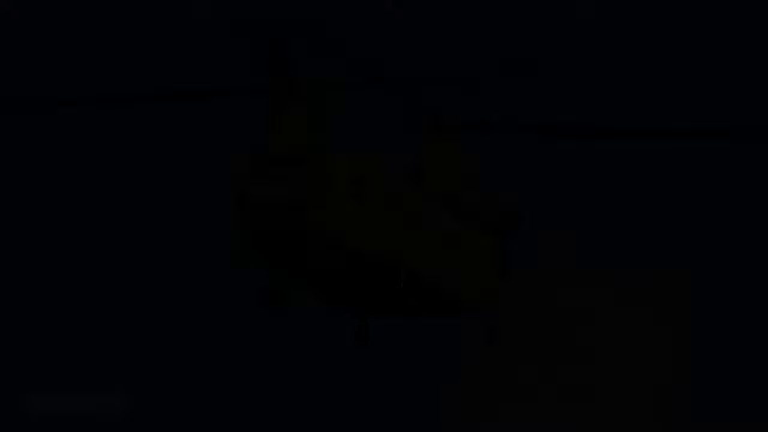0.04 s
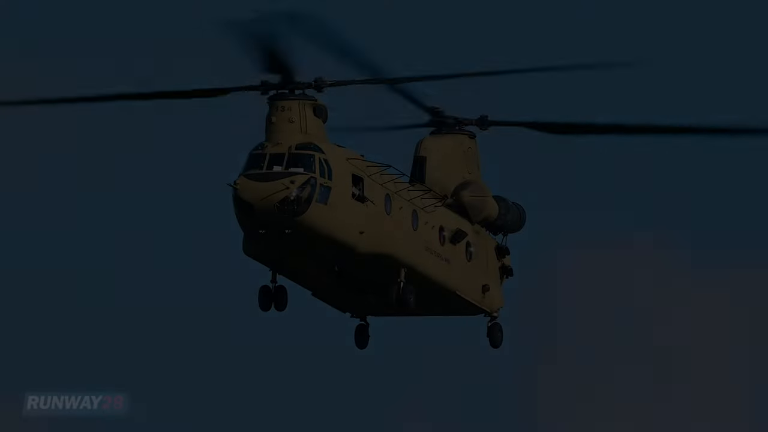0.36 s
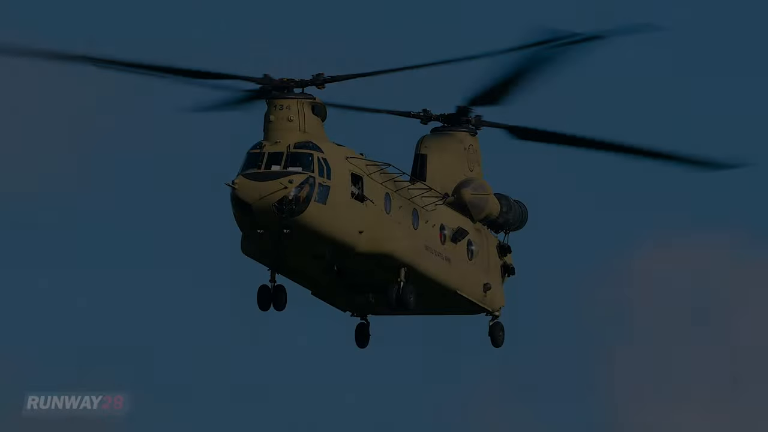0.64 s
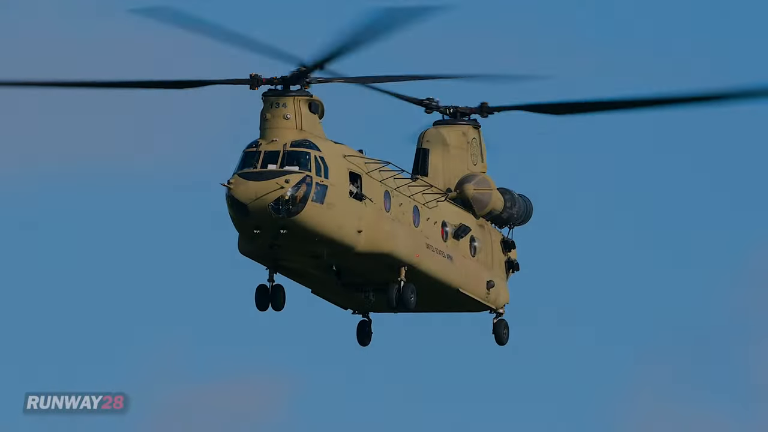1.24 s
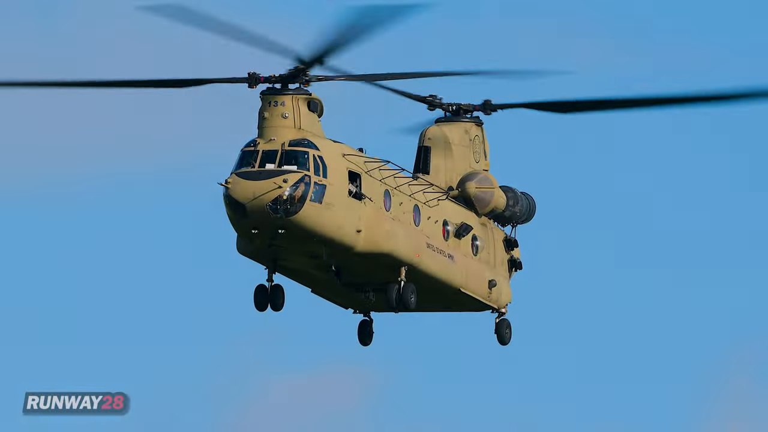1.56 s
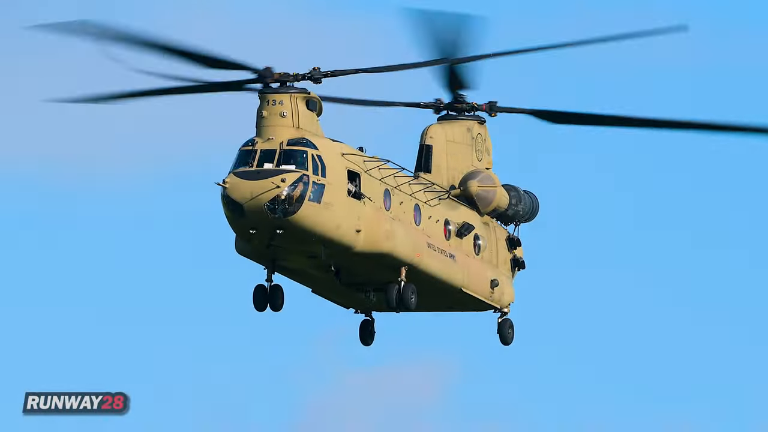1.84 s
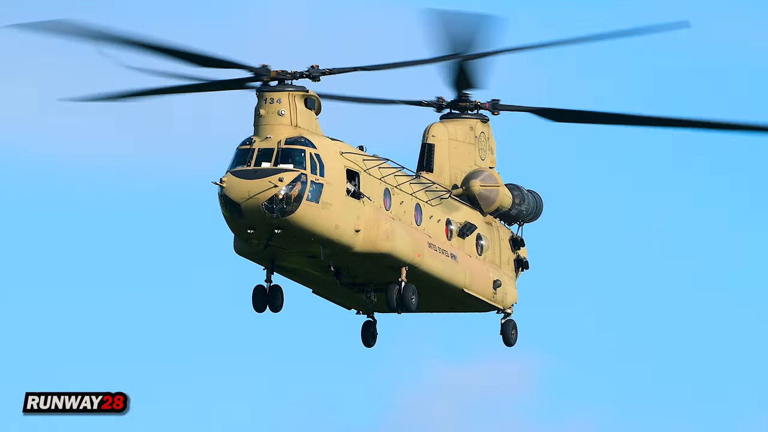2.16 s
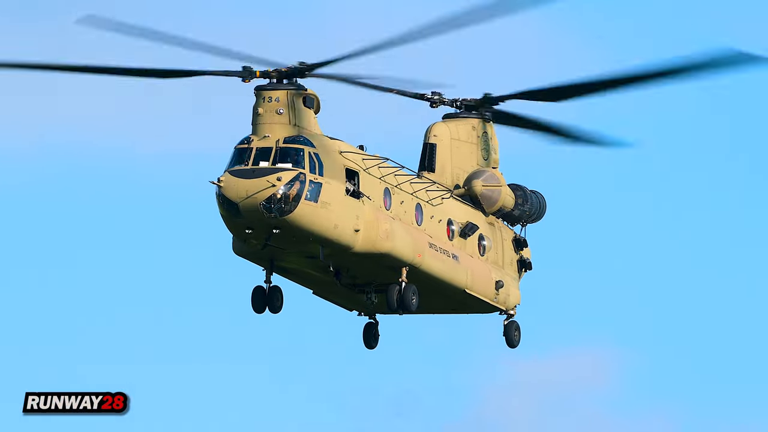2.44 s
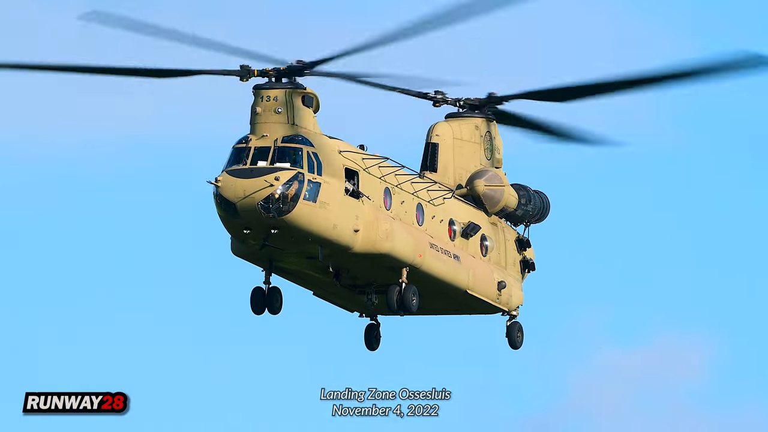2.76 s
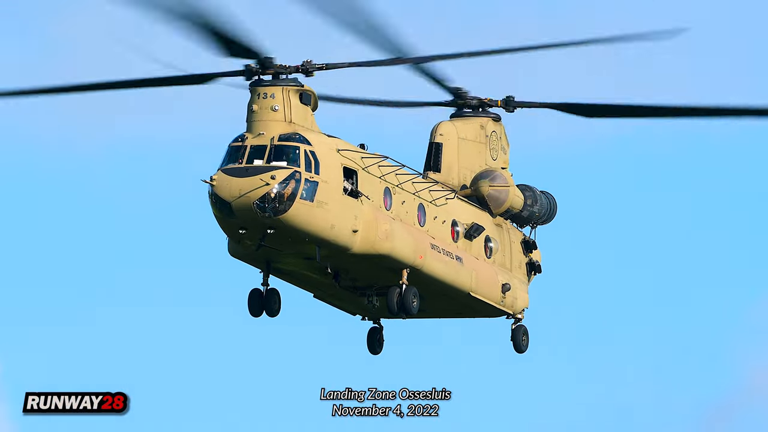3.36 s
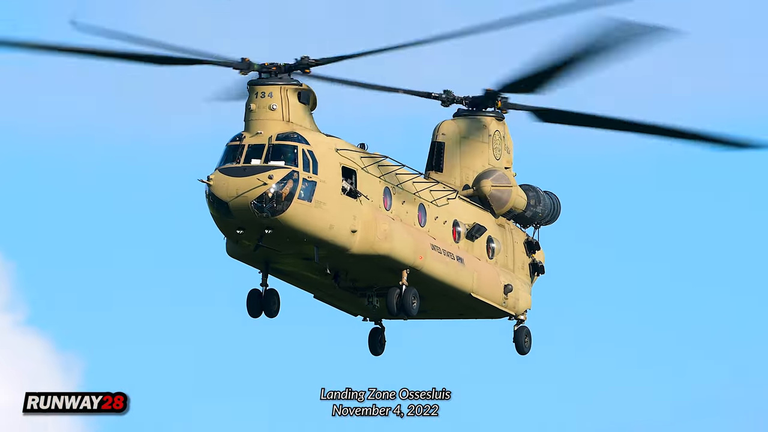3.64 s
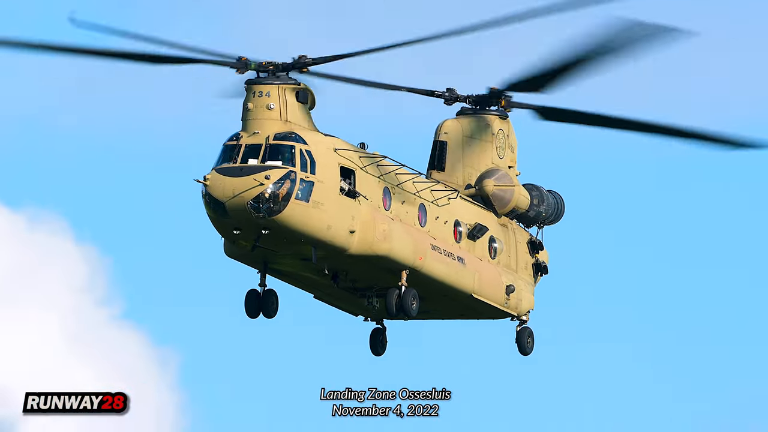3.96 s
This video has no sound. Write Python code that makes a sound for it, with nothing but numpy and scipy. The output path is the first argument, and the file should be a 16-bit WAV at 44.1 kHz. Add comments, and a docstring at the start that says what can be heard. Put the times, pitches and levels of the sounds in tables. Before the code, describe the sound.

A twin-rotor helicopter fades in from silence in open air, reaching full loudness by about 1.5 to 2 seconds. Its blades beat in a fast, even chop of low thumps and ragged slaps over rushing air and turbine hiss. A high gear whine stands out from about 1.7 to 2.5 seconds. The slaps soften around 2 seconds, then harden a little after 3.3 seconds as the helicopter stays loud.

```python
"""Open air, a tandem-rotor helicopter coming past a nearly mono microphone.
The sound fades in from silence: rotor wash, turbine hiss and a gearbox whine. Over them each blade pass
gives low thumps and two ragged slaps where blades cut the vortices of the other rotor; their spacing
drifts as the aircraft moves. By about two seconds the fade is fully up and the hard slaps have gone soft;
near the end they harden a little again. A limiter holds the peaks."""
import sys
import numpy as np
from scipy import signal
from scipy.fft import rfft, irfft, next_fast_len
from scipy.io import wavfile
from scipy.ndimage import uniform_filter1d, minimum_filter1d, map_coordinates

SR = 44100
rng = np.random.default_rng(int(sys.argv[2]) if len(sys.argv) > 2 else 0)


def bounce(signal):
    """Save signal as a 16-bit WAV file at the path given by the first command-line argument."""
    frames = np.transpose(np.atleast_2d(signal))
    limited = np.clip(frames, -1, 1)
    pcm = np.round(limited * 32767).astype(np.int16)
    wavfile.write(sys.argv[1], SR, pcm)


N = 176400

# Steady noise before the fader (time [s], rotor wash [dB], turbine hiss [dB], flutter depth [dB])
AIR_LEVELS = [(.2, -18, -27.5, 0), (.8, -25, -30, -1), (1.3, -25, -27.5, -1.6), (1.75, -24.5, -26.5, 0.5),
              (2.3, -18, -24.5, 1.1), (2.6, -18, -26, 2), (3.05, -19.5, -28.5, 1), (3.5, -19, -24.5, 2),
              (4, -13.5, -21.5, 2.5)]
# How hard the blades slap (time [s], hardness [0-1])
HARDNESS = [(0.199, 0.94), (1.8, 0.51), (2.149, 0), (3.3, 0.01), (4, 0.55)]


def amp(db):
    """Decibels to gain."""
    return 10 ** (np.asarray(db) / 20)


def unit(x):
    """Scale to rms 1."""
    return x / np.sqrt(np.mean(x ** 2) + 1e-20)


def curves(rows, at=None):
    """Each column after the time, at the given times or at every sample."""
    times, *columns = np.transpose(rows)
    return [np.interp(np.arange(N) / SR if at is None else at, times, c) for c in columns]


def wobble(rate):
    """A smooth random curve, rate knots a second."""
    knots = rng.standard_normal(int(N * rate / SR) + 4)
    return map_coordinates(knots, [np.arange(N) * rate / SR])


def gain_at(hz, colour):
    """Gain of a (frequency [Hz], level [dB]) shape at the given frequencies."""
    f, db = np.transpose(colour)
    return amp(np.interp(np.log(hz + 1), np.log(f), db))


def coloured(x, colour, size=4096):
    """x through a minimum-phase filter of energy 1 with the given shape."""
    cepstrum = irfft(np.log(gain_at(np.fft.rfftfreq(size, 1 / SR), colour)))
    cepstrum[1:size // 2] *= 2
    cepstrum[size // 2 + 1:] = 0
    impulse = irfft(np.exp(rfft(cepstrum)))
    return signal.fftconvolve(x, impulse / np.linalg.norm(impulse))[:N]


def add(track, s, sound):
    """Mix a sound into a track, centred on time s."""
    i = round(s * SR) - len(sound) // 2
    track[i:i + len(sound)] += sound


def alike(draw, count, likeness=0.76):
    """Random patterns, each partly kept from the blade pass before."""
    rows = [draw()]
    for _ in range(count - 1):
        rows.append(likeness * rows[-1] + np.sqrt(1 - likeness ** 2) * draw())
    return rows


def rotor_wash():
    """Air driven by the rotors: a low, unsteady rush."""
    colour = [(30, -39), (70, -50.5), (110, -20), (165, -1), (230, 2), (300, -5.5), (480, -7.5),
              (750, -11.5), (1300, -16.5), (2200, -33.5), (4000, -53.5), (7500, -80)]  # wash spectrum (frequency [Hz], level [dB])
    level_db = curves(AIR_LEVELS)[0] + 0.96 * wobble(40)
    return amp(level_db) * unit(coloured(rng.standard_normal(N), colour))


def flutter(pass_s=0.0849, peak_s=0.18):
    """The engines' treble rises and falls once per blade pass, in dB."""
    return curves(AIR_LEVELS)[2] * np.cos(2 * np.pi * (np.arange(N) / SR - peak_s) / pass_s)


def turbines():
    """Engine hiss and its thin top, both fluttering at the blade rate."""
    hiss_colour = [(300, -12), (900, 2.5), (1500, 2.5), (1780, 2.5), (2030, 3), (2450, -0.5), (2750, -1),
                   (3300, -1), (3750, -2), (4150, -10), (4700, -24), (6000, -33), (7500, -43.5)]  # hiss spectrum (frequency [Hz], level [dB])
    top_colour = [(3000, -29), (4200, 7), (4800, 2.5), (5800, -3), (7000, -14.5), (7400, -9.5), (7700, -37)]  # spectrum of the thin top (frequency [Hz], level [dB])
    top_level = [(.2, -52), (1, -58), (2, -55.5), (2.6, -49), (3.3, -50.5), (3.6, -45), (4, -46)]  # the top before the fader (time [s], level [dB])
    hiss_db = curves(AIR_LEVELS)[1] + flutter() + 1.46 * wobble(24.915)
    top_db = curves(top_level)[0] + flutter()
    hiss = unit(coloured(rng.standard_normal(N), hiss_colour))
    top = unit(coloured(rng.standard_normal(N), top_colour))
    return amp(hiss_db) * hiss + amp(top_db) * top


def gearbox(whine_hz=1868, waver_hz=6, sideband_hz=136, blur_hz=30):
    """A rough gear tone, a sideband and the blurred octave, flickering in the moving air."""
    levels = [(.2, -48.5, -41.5), (1.3, -38.5, -55), (1.6, -37.5, -48.5), (1.67, -29, -46),
              (1.9, -32, -41.5), (2.15, -30, -37.5), (2.44, -29.5, -38.5), (2.55, -39, -44),
              (2.8, -40, -39), (3.1, -48, -41.5), (4, -44, -40.5)]  # whine before the fader (time [s], fundamental [dB], octave [dB])

    def tone(hz, db):
        flicker_db = 1.5 * wobble(25) + 2.8 * wobble(160)
        return np.sqrt(2) * amp(db + flicker_db) * np.sin(2 * np.pi * np.cumsum(hz) / SR)

    gear_db, octave_db = curves(levels)
    gear_hz = whine_hz + waver_hz * wobble(30)
    fundamental = tone(gear_hz, gear_db)
    sideband = tone(gear_hz + sideband_hz + blur_hz * wobble(160), gear_db - 10)
    octave = tone(2 * gear_hz + blur_hz * wobble(200), octave_db + 3 * flutter())
    return fundamental + sideband + octave


def thumps(times, levels):
    """The pressure pulse of each blade: a dry, low knock."""
    colour = [(50, -19.5), (120, -5.5), (200, 4.5), (290, 1), (450, -10), (700, -18.5), (1200, -36.5),
              (4000, -68.5)]  # thump spectrum (frequency [Hz], level [dB])
    pulses = np.bincount(np.round(times * SR).astype(int), -amp(levels) * np.sqrt(0.0074 * SR), N)
    return coloured(pulses[:N], colour)


def slaps(times, levels, hard, soft, rise_s, hold_s, decay_s, soft_stretch, crack, pops_per_s):
    """A blade cuts a vortex: three quick clicks within a burst of pops; soft slaps click less."""
    track, t = np.zeros(N + SR), np.arange(-SR // 20, SR // 20) / SR
    clicks, click_gap_s = np.arange(3), 0.001968

    def crackle():
        return rng.choice([-1, 1], len(t)) * (0.022 + (rng.random(len(t)) < pops_per_s / SR))

    patterns = alike(crackle, len(times))
    for s, db, hardness, pops in zip(times, levels, curves(HARDNESS, times)[0], patterns):
        age = t / (1 + soft_stretch * (1 - hardness))
        envelope = np.exp(-np.where(age < 0, (age / rise_s) ** 2, np.maximum(age - hold_s, 0) / decay_s))
        slap = pops * envelope
        slap /= np.linalg.norm(slap)
        click_s = click_gap_s * (clicks - 1 + 0.26 * rng.standard_normal(3))
        click_at = len(t) // 2 + np.round(click_s * SR).astype(int)
        slap[click_at] -= crack * (.5 + .5 * hardness) * 0.82 ** clicks
        gain = amp(db) * np.sqrt(0.0092 * SR) / np.linalg.norm(slap)
        add(track, s + .0002 * rng.standard_normal(), gain * slap)
    hard_share = curves(HARDNESS)[0]
    return coloured(track[:N] * hard_share, hard) + coloured(track[:N] * (1 - hard_share), soft)


def air_bursts(times, level, colour, width_s):
    """Noise that swells around each given time, more abruptly when the slaps are hard."""
    track, t = np.zeros(N + SR), np.arange(-SR // 20, SR // 20) / SR
    for s, noise in zip(times, alike(lambda: rng.standard_normal(len(t)), len(times))):
        rise_s = width_s * (1 - 0.7 * curves(HARDNESS, s)[0])
        gate = np.exp(-(t / np.where(t < 0, rise_s, width_s)) ** 2)
        burst = unit(gate * coloured(noise, colour)[:len(t)])
        add(track, s, burst * np.sqrt(np.mean(gate ** 2)))
    return track[:N] * amp(curves(level)[0])


def swish(first_s, second_s):
    """A rasp of air at each blade pass, moving from the first slap to midway between the two."""
    colour = [(700, -11.5), (1500, 3), (2100, 6), (2400, -2), (2800, 5), (3300, -2.5), (3900, -4.5),
              (4600, -25.5), (7500, -62.5)]  # rasp spectrum (frequency [Hz], level [dB])
    level = [(.2, -13.5), (1, -27.5), (1.799, -27), (2.399, -32), (2.9, -22.5), (3.25, -21.5), (3.399, -24),
             (4, -24.5)]  # rasp before the fader (time [s], level [dB])
    place = [(.8, .05), (1.2, .5)]  # where it falls (time [s], way from first slap to second [0-1])
    times = first_s + curves(place, first_s)[0] * (second_s - first_s)
    return air_bursts(times, level, colour, width_s=0.014)


def whomp(first_s, second_s):
    """A low push of air just after the midpoint of each pair of slaps."""
    colour = [(60, -38), (120, -14.5), (190, 6.5), (270, 2), (350, -1), (470, -3), (650, -19.5),
              (1200, -32), (4000, -67)]  # whomp spectrum (frequency [Hz], level [dB])
    level = [(.2, -15), (1, -19.5), (1.7, -19), (2.3, -16), (2.9, -12.5), (3.402, -18.5), (4, -15)]  # whomp before the fader (time [s], level [dB])
    return air_bursts((first_s + second_s) / 2 + 0.00353, level, colour, width_s=0.02)


def rotors():
    """Each blade pass: a thump from each rotor, and two slaps within a swish and a whomp."""
    # Blade passes before the fader (time [s], thump [dB], other rotor's thump delay [ms], level [dB],
    # first slap delay [ms], level [dB], second slap delay [ms], level [dB])
    passes = [(0.1718, -13.4, 34, -10.3, 27.6, -6.3, 43, -9), (0.2568, -14.2, 33, -14.1, 26, -8, 42, -14),
              (0.3395, -14.8, 34, -16, 26.5, -7.5, 42, -11.8),
              (0.4219, -14.6, 37, -18, 27.7, -8.5, 44, -12),
              (0.5066, -13, 28, -10.8, 27, -7.5, 48.0, -13.5), (0.5906, -14.5, 34, -8.5, 25, -7, 50, -12.5),
              (0.6731, -15.5, 32, -16.8, 30.3, -9, 48, -12), (0.7574, -16, 30, -21, 29.2, -12.5, 43.7, -11),
              (0.843, -15.5, 29, -15, 28.5, -11.5, 44.5, -8.5),
              (0.9283, -32.7, 30, -13.5, 27.8, -8.5, 48.4, -10),
              (1.013, -17, 29, -13, 24.7, -12.5, 44.4, -6.5),
              (1.0982, -18.3, 29, -11.5, 24, -10, 43.5, -8.5),
              (1.1806, -21.2, 34, -13.4, 28.2, -9.5, 47, -9.5), (1.266, -20, 36, -11.5, 27.4, -7.6, 53, -9),
              (1.3515, -17, 32, -23, 28.4, -7, 49.7, -9), (1.4326, -22, 39, -13, 30.4, -11, 56.4, -9.5),
              (1.5208, -11.5, 34, -7, 29, -9.3, 52, -10.5), (1.6051, -12.9, 33, -3, 28.3, 1, 58, -13.5),
              (1.6903, -20, 34, -17, 30.5, -9, 51, -6), (1.776, -13, 38, -19, 26.3, -0.5, 54, -9.5),
              (1.8612, -13, 32, -17, 24.2, -9, 44, -7), (1.9453, -15.4, 31, -28.6, 24.3, -12, 46, -13.4),
              (2.0318, -12, 30, -12, 32.7, -14, 49.3, -14), (2.1177, -13.5, 30, -8, 24.4, -11.5, 46, -17.5),
              (2.2024, -16.5, 31, -6.5, 21.2, -20, 56, -25), (2.2899, -13.5, 32, -12.5, 24, -12.3, 41, -17),
              (2.3751, -12.5, 28, -10.5, 25.2, -14, 42.3, -10),
              (2.4588, -15, 32, -13, 20.4, -12.5, 47.3, -13), (2.5469, -7, 26, -31, 20.7, -14, 39, -17),
              (2.6307, -17, 27, -6, 20.3, -21, 39, -16.5), (2.717, -11.5, 25, -12, 23.4, -12, 39.3, -13),
              (2.8036, -10, 29, -13, 23.1, -6, 35, -16), (2.888, -12.5, 24, -17.5, 24.7, -13.3, 37, -9.5),
              (2.9726, -8.5, 28, -7, 22.3, -16, 31, -9), (3.0602, -9, 24, -10.5, 29, -11.5, 33, -9),
              (3.1443, -8.5, 26, -13, 20.4, -11, 35.6, -8), (3.2289, -8, 26, -9, 19.3, -12.5, 35.2, -10.5),
              (3.3159, -7, 24, -7.5, 23.5, -13, 32.5, -15), (3.4012, -7, 29, -24, 20.5, -8.5, 30.3, -8),
              (3.4852, -4, 26, -17, 26, -15, 30.5, -19), (3.572, -6, 24, -8, 27.3, -6, 22.4, -8.5),
              (3.658, -7, 29, -15, 22.7, -16, 29.4, -9), (3.7412, -8, 27, -11, 24.4, -12, 32.3, -16),
              (3.8272, -7.9, 31, -14, 26.6, -6, 29, -20), (3.912, -3.5, 30, -10.5, 25.4, -10.5, 29.7, -21)]
    # Spectra of the two slaps, hard and soft (frequency [Hz], level [dB])
    first_hard = [(60, -34.5), (120, -34), (230, -7.5), (340, -3), (460, 4), (630, -8.5), (850, -2),
                  (1080, 1.5), (1400, -14.5), (2100, -10.5), (2600, -25.5), (3700, -24.5), (4600, -46.5),
                  (7500, -86)]
    first_soft = [(60, -28), (120, -16.5), (200, 6), (280, 3), (400, -4), (800, 0), (1200, -14),
                  (2200, -23.5), (3600, -24.5), (4600, -36.5), (7500, -63.5)]
    second_hard = [(60, -51), (130, -20), (290, 11), (420, 5), (550, 5), (800, -11), (1400, -3),
                   (2500, -32.5), (3700, -16), (4600, -44), (7500, -74)]
    second_soft = [(60, -51), (120, -1), (210, -6), (340, -6), (490, 5), (700, -2), (1100, -6.5),
                   (2200, -18.5), (3600, -30), (4600, -44.5), (7500, -65)]
    times, thump_db, other_ms, other_db, first_ms, first_db, second_ms, second_db = np.transpose(passes)
    other_s, first_s, second_s = times + np.array([other_ms, first_ms, second_ms]) / 1000
    knocks = thumps(times, thump_db) + thumps(other_s, other_db)
    first = slaps(first_s, first_db, first_hard, first_soft,
                  rise_s=.002, hold_s=.002, decay_s=.0045, soft_stretch=.9, crack=.7, pops_per_s=900)
    second = slaps(second_s, second_db, second_hard, second_soft,
                   rise_s=.006, hold_s=.004, decay_s=.009, soft_stretch=0, crack=.35, pops_per_s=700)
    return knocks + first + second + swish(first_s, second_s) + whomp(first_s, second_s)


def scene(side_delay_s=0.0037):
    """The whole sound fades in from silence; almost mono, a little wider in the treble."""
    fader = [(0, -102), (.12, -56), (.2, -47), (.3, -35), (.45, -24), (.62, -16.5), (.85, -8), (1.1, -6),
             (1.45, 0.5), (2, 2), (4, -2)]  # gain on the whole sound (time [s], level [dB])
    width = [(60, -64), (150, -66), (300, -65), (500, -64.5), (1000, -59.5), (2000, -36), (3600, -24),
             (5000, -20), (7500, -12)]  # stereo width (frequency [Hz], side relative to mid [dB])
    mid = amp(curves(fader)[0]) * (rotors() + rotor_wash() + turbines() + gearbox())
    size = next_fast_len(N + SR // 2)
    hz = np.fft.rfftfreq(size, 1 / SR)
    delay = np.exp(-2j * np.pi * hz * side_delay_s)
    side = irfft(rfft(mid, size) * gain_at(hz, width) * delay, size)[:N]
    return np.array([mid + side, mid - side])


def record(dry, low_cut_hz=134.3, ceiling=0.69, limiter_samples=130, top_hz=7750):
    """The microphone's low cut, a fast limiter, then a steep band limit."""
    thin = signal.sosfilt(signal.butter(5, low_cut_hz, "highpass", fs=SR, output="sos"), dry)
    needed_gain = np.minimum(1, ceiling / (np.abs(thin).max(0) + 1e-9))
    held = thin * uniform_filter1d(minimum_filter1d(needed_gain, limiter_samples), limiter_samples)
    size = next_fast_len(N + SR // 2)
    hz = np.fft.rfftfreq(size, 1 / SR)
    return irfft(rfft(held, size) / np.sqrt(1 + (hz / top_hz) ** 90), size)[:, :N]


dry = scene()
out = record(dry)
bounce(out)
```